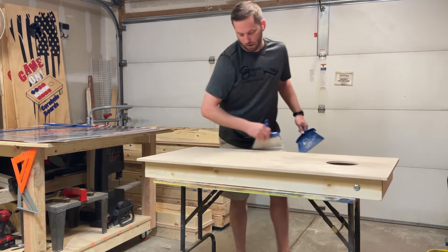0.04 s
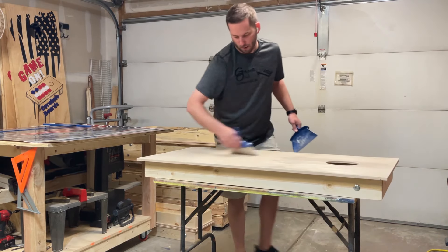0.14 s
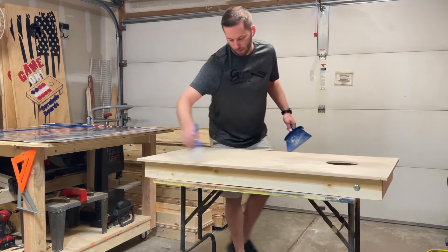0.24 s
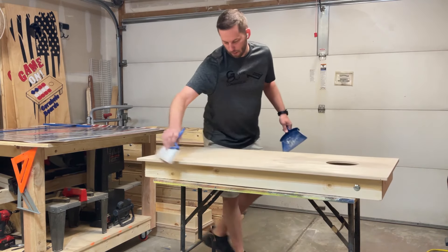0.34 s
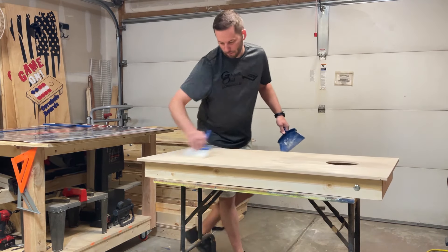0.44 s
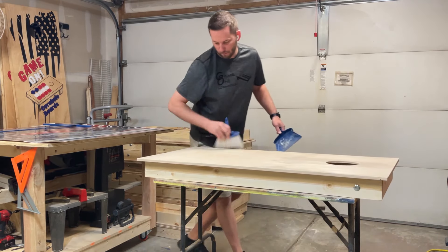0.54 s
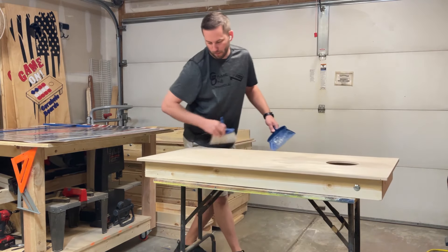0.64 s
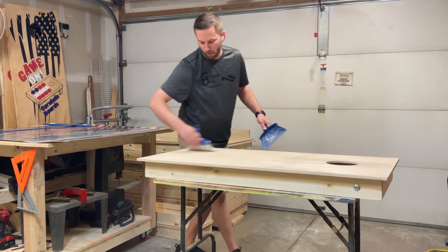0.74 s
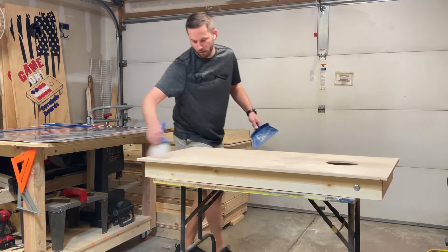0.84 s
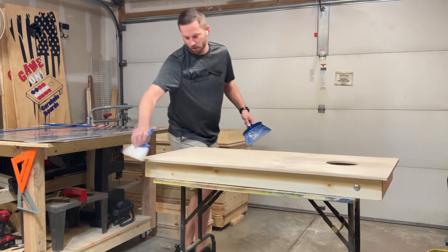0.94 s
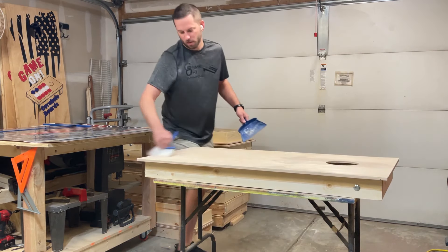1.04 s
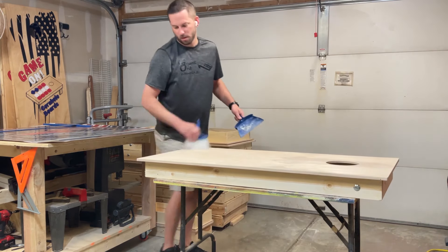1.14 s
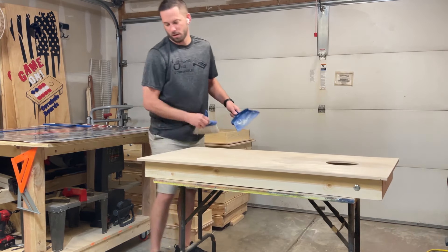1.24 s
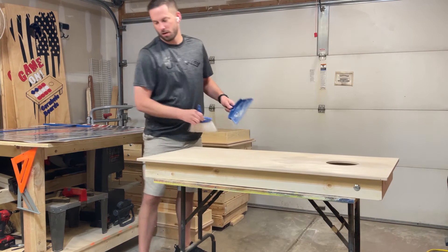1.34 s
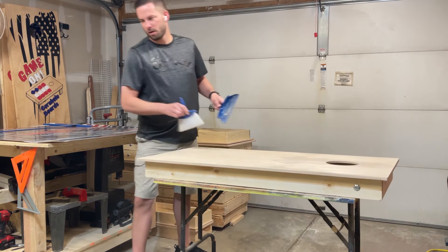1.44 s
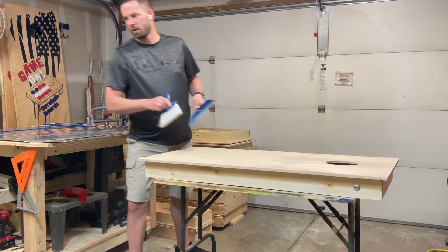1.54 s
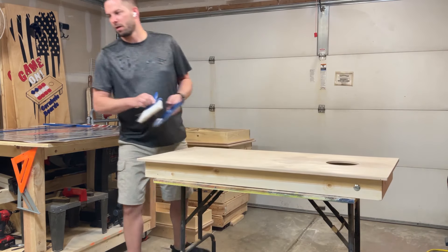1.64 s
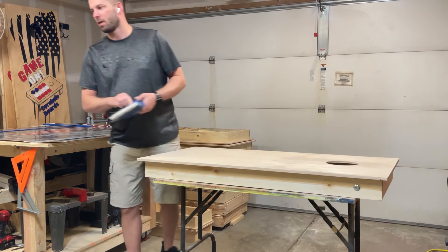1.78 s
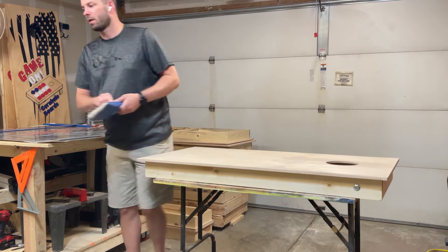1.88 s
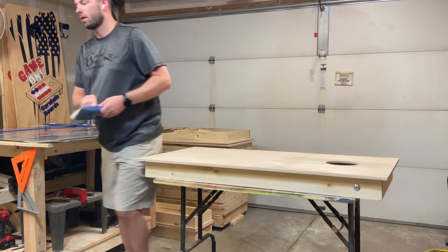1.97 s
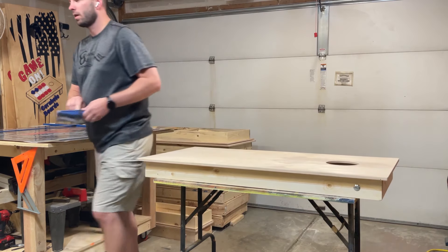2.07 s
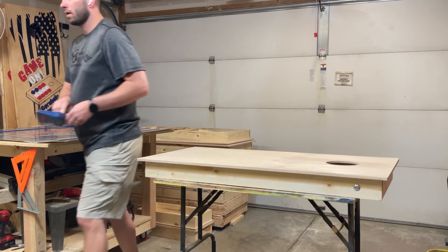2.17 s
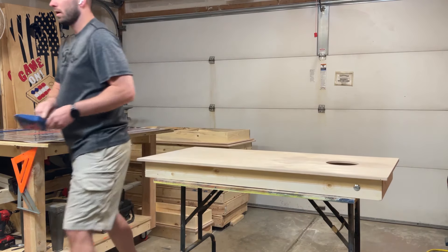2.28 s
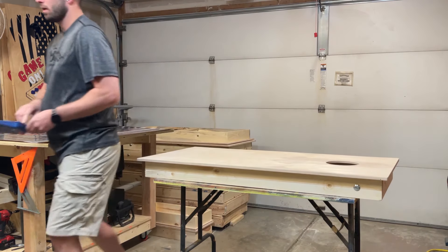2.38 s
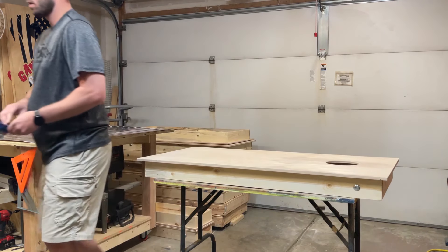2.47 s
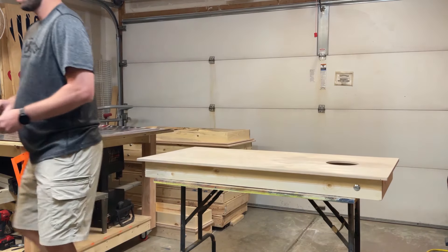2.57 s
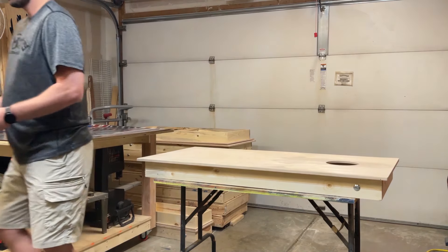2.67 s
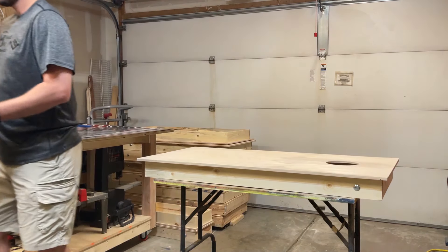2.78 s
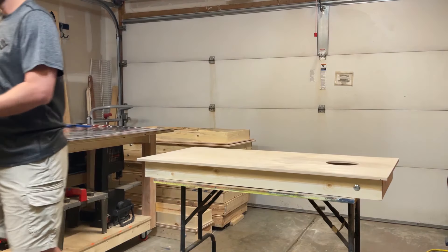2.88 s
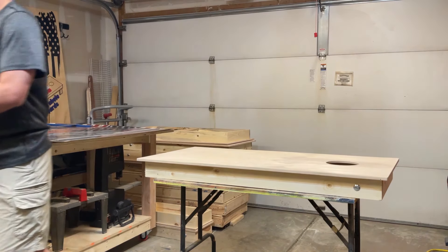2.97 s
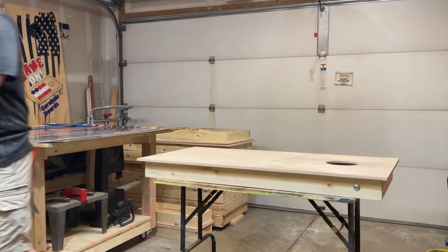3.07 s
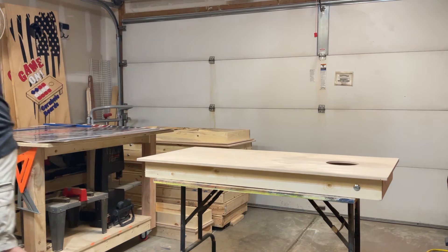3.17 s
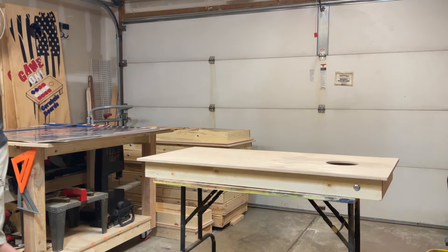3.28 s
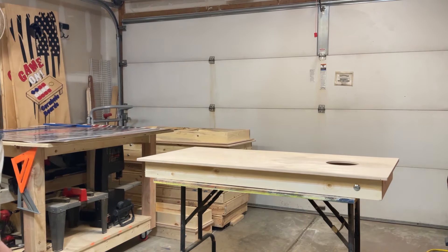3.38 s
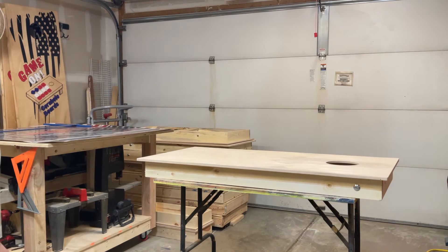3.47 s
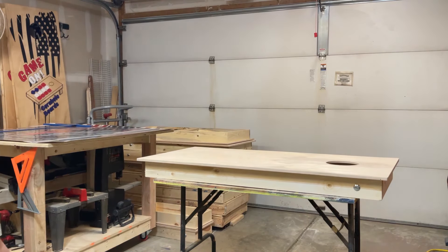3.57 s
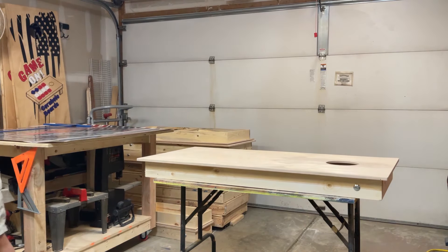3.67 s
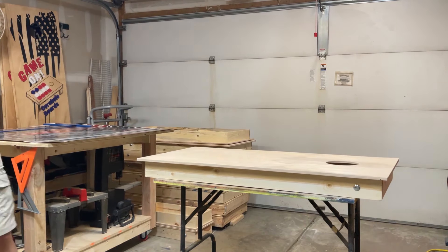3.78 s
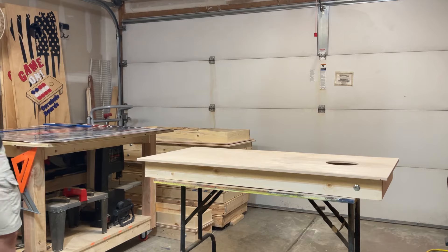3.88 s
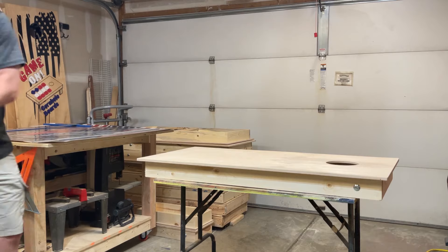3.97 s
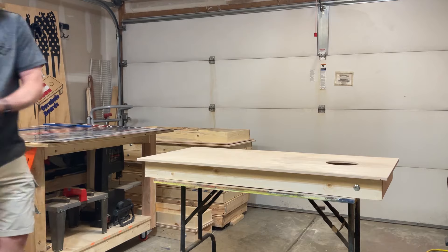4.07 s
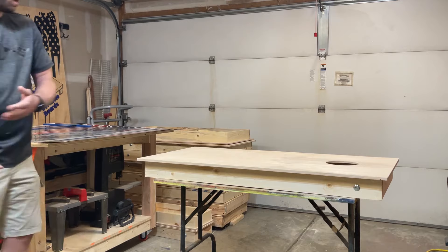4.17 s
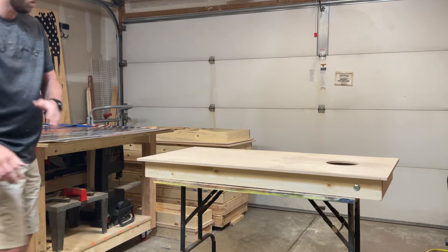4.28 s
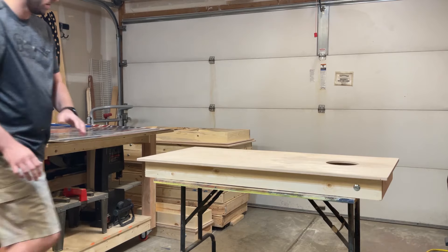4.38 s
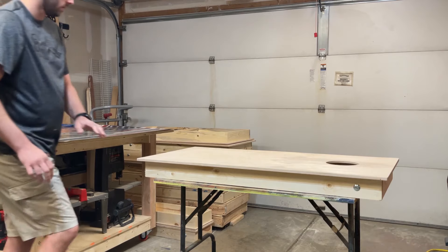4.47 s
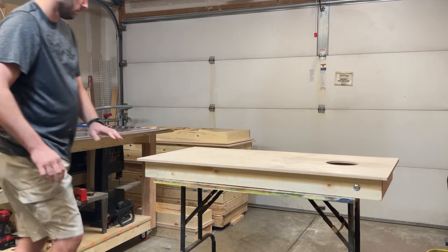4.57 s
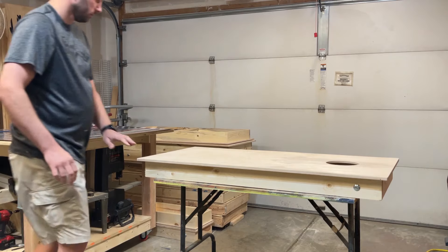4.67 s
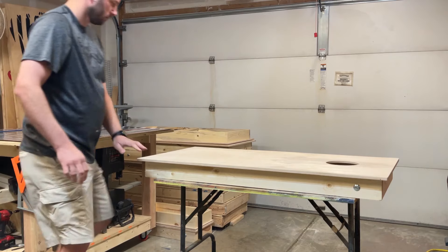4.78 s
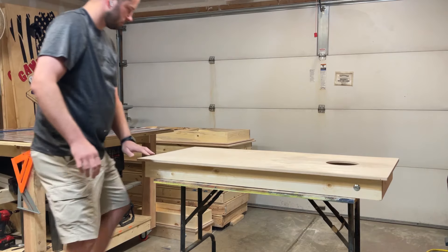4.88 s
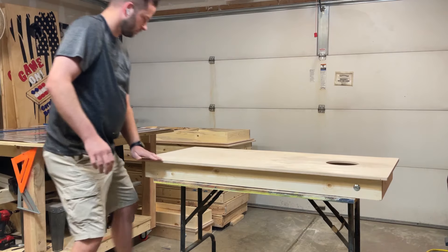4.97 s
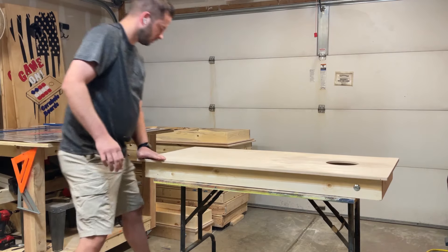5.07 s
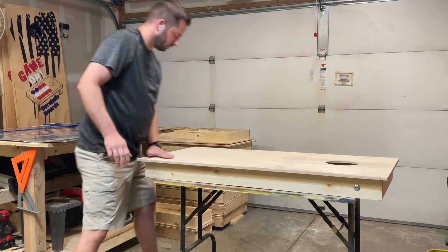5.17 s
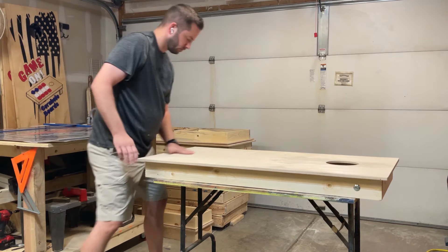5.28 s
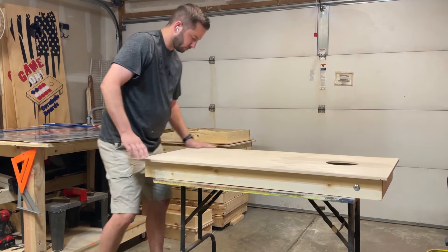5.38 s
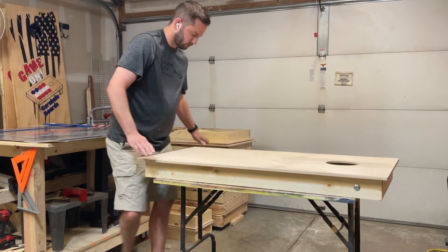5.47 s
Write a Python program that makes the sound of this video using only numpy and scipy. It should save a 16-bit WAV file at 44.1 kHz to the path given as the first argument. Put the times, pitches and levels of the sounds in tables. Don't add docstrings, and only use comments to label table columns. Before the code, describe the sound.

Quick sweeping hisses and low woody thuds come first, with thin plastic clacks from the broom. Quieter shoe scuffs and light plastic ticks follow, then a sharp clatter as broom and dustpan land on a wooden bench and settle. A few soft scuffs lead to a long, smooth hand rub on wood. The garage sounds reverberant, heard from a few steps away, with faint hum and air noise.

```python
import sys
import numpy as np
from scipy import signal
from scipy.io import wavfile
from scipy.ndimage import uniform_filter1d

SR = 44100
rng = np.random.default_rng(int(sys.argv[2]) if len(sys.argv) > 2 else 0)


def volts_from_db(level):
    exponent = np.asarray(level, float) / 20
    return 10 ** exponent


def materialize(psi):
    bounded = np.clip(np.atleast_2d(psi).T, -1, 1)
    quanta = np.round(bounded * 32767).astype(np.int16)
    wavfile.write(sys.argv[1], SR, quanta)


N = 243746


def evened(x):
    return x / np.sqrt(np.mean(x ** 2) + 1e-20)


def read(points, hz):
    f, value = np.transpose(points)
    return np.interp(np.log(hz + 1), np.log(f + 1), value)


def column(points, t):
    return np.interp(t, *np.transpose(points))


def ring(x, modes):
    out = np.zeros(len(x))
    for k, (hz, width, db) in enumerate(modes):
        r = np.exp(-np.pi * width / SR)
        w = 2 * np.pi * min(hz, 15000) / SR
        mode = signal.lfilter([1 - r, 0, r - 1], [1, -2 * r * np.cos(w), r * r], x)
        out += (-1) ** k * volts_from_db(db) * mode
    return out


def slips(per_s, spread_db):
    size = volts_from_db(spread_db * np.minimum(rng.exponential(1, N), 5))
    sign = rng.choice([-1., 1.], N)
    return evened(size * sign * (rng.random(N) < per_s / SR))


def coloured(x, spectrum, bright_db=None, patchy_db=0., size=256):
    overlap = size * 3 // 4
    hz, t, z = signal.stft(x, SR, nperseg=size, noverlap=overlap)
    patches = uniform_filter1d(rng.standard_normal(z.T.shape), 25, 0)
    patches = evened(uniform_filter1d(patches, 4, 1)).T
    gain = volts_from_db(read(spectrum, hz)[:, None] + patchy_db * patches)
    if bright_db is not None:
        octaves = np.log2(np.maximum(hz, 500)[:, None] / 4500)
        gain *= volts_from_db(octaves * bright_db(t) / 1.43)
        middle = (hz > 1500) & (hz < 9000)
        gain /= np.sqrt((gain[middle] ** 2).sum(0) * 2 / size)
    return signal.istft(z * gain, SR, nperseg=size, noverlap=overlap)[1][:N]


def contact(row, t, touch_s, bend, fade):
    s, length, db, landing_db = row[:4]
    swell = landing_db * np.clip(1 - (t - s) / length, 0, 1) ** bend
    lift = np.maximum(t - s - length, 0) * fade
    touch = np.clip(1 + (t - s) / touch_s, 0, 1) ** 2
    return volts_from_db(db + swell - lift) * touch, swell, lift


def drag(hisses, drums, touch, spectrum, body, usual_db, per_s, spread_db, patchy_db, bumps_per_s):
    t = np.arange(0, N / SR, 1 / 2000)
    fine = np.arange(N) / SR
    touch_s, bend, hiss_fade, drum_fade, dull_before, dull_after, landing_dull_db = touch
    contacts = [contact(row, t, touch_s, bend, hiss_fade) for row in hisses]
    level, swell, lift = np.transpose(contacts, (1, 0, 2))

    bright = np.array(hisses)[:, 4:] + dull_before * swell - dull_after * np.minimum(lift, 25)
    since_touch = abs(t - np.array(hisses)[:, :1])
    bright -= landing_dull_db * np.exp(-since_touch / 0.027)
    bright = np.average(bright, axis=0, weights=level ** 2 + 1e-30)

    def bright_db(s):
        return np.interp(s, t, bright) - usual_db

    hiss = coloured(slips(per_s, spread_db), spectrum, bright_db, patchy_db)
    drum = evened(ring(slips(bumps_per_s, 2.14), body))
    drum /= np.sqrt(uniform_filter1d(drum ** 2, 2600) + .05)
    load = sum(contact(row, t, touch_s, bend, drum_fade)[0] for row in drums)
    return np.interp(fine, t, level.sum(0)) * hiss + np.interp(fine, t, load) * drum


# factor on the clack f, width as a share of it, level/dB
SHELL = [(.47, .2, 1), (.68, .2, 3), (1.0, .16, 7), (1.3, .2, 3), (1.9, .3, -1), (2.8, .4, -5)]


def knocks(events, body, tick, rise_s):
    out = np.zeros(N + SR)
    t = np.arange(SR // 4) / SR
    chance = rng.standard_normal((len(events), len(t)))
    for (s, clack_db, hz, thud_db, t60), noise in zip(events, chance):
        rattle = noise * volts_from_db(-60 * t / max(t60, .01)) * (1 + tick * np.exp(-t / 0.00062))
        shell = [(k * hz, w * hz, db) for k, w, db in SHELL if k * hz < SR / 3]
        dull = signal.butter(2, min(2.55 * hz, 15000), fs=SR, output="sos")
        clack = signal.sosfilt(dull, ring(rattle, shell))
        thud = ring(rattle * np.minimum(t / rise_s, 1), body)
        at = slice(round(s * SR), round(s * SR) + len(t))
        out[at] += volts_from_db(clack_db - 1.5) * clack / abs(clack).max() + volts_from_db(thud_db) * thud / abs(thud).max()
    return out[:N]


# f/Hz, level/dB per Hz
AIR = [(15, -21), (25, -21), (129, -1.5), (300, -22), (582, -12), (803, -32), (1240, -15.5), (1620, -25),
       (4490, -19), (4870, -20), (13200, -37.5), (15500, -76)]
# t/s, level/dB
STIR = [(0, 17.5), (1.7, 1.5), (1.83, -0.5), (2.6, -0.5), (2.82, 4), (2.89, -2), (2.94, 1.5), (3.0, -5),
        (3.09, -1), (3.2, -2), (3.95, 2), (4.02, 2), (4.3, 4), (4.6, -0.5), (5.1, 2), (5.53, -5)]
# t/s, level/dB
HUM = [(0.0, -46), (.28, -62), (.6, -45.5), (1.05, -60), (1.3, -46.5), (1.48, -65), (1.62, -50.5),
       (1.8, -63), (2.1, -49), (3.17, -47.5), (3.4, -59), (3.65, -47.5), (3.95, -59.5), (4.28, -71),
       (4.6, -62), (4.85, -45), (5.05, -51.5), (5.53, -43)]
# f/Hz, width/Hz, level/dB
DRONE = (163, 47, 0)


def background():
    t = np.arange(N) / SR
    air = evened(coloured(rng.standard_normal(N), AIR, patchy_db=2.5, size=2048))
    hz, s, z = signal.stft(air, SR, nperseg=512)
    octaves = np.log2(np.maximum(hz, 500) / 1000)
    stir_db = column(STIR, s) * (0.5 + 0.22 * octaves)[:, None]
    air = signal.istft(z * volts_from_db(stir_db), SR, nperseg=512)[1][:N]

    hum_hz, wander_hz = 95.5, 4.34
    beat_per_s, beat_top_s, beat_depth = 5, 2.97, 0.3
    wander = uniform_filter1d(rng.standard_normal(N), 3000)
    wander = evened(uniform_filter1d(wander, 3000))
    hum = np.sqrt(2) * np.sin(2 * np.pi * np.cumsum(hum_hz + wander_hz * wander) / SR)
    beat = 1 + beat_depth * np.cos(2 * np.pi * beat_per_s * (t - beat_top_s))

    drone = evened(ring(rng.standard_normal(N), [DRONE]))
    return volts_from_db(-55) * air + volts_from_db(-69.5) * drone + volts_from_db(column(HUM, t)) * beat * hum


# t/s, length/s, bristle hiss level/dB, landing/dB against it, brightness/dB
STROKES = [(0.0, 0.012, -24.5, 4.5, -12), (0.02, 0.055, -25.5, -4, -5), (.223, 0.04, -34.5, -5, 9),
           (.5, 0.018, -44, -8, -12), (.826, 0.021, -38, -12, -9), (1.102, 0.0075, -41.5, 3, -4),
           (1.25, 0.029, -26, -2, -4.5), (1.33, 0.038, -50.5, -12, -6), (.228, 0.16, -22, -14.5, -8.5),
           (.5, 0.15, -22, -13.5, -6.5), (.79, 0.024, -37, -4, -16.5), (.826, .15, -22.5, -10.5, -7),
           (1.102, 0.14, -20, -22.5, -12.5), (1.47, 0.11, -52, -6, -16)]
# t/s, length/s, level/dB, landing/dB against it
BOARD_DRUM = [(0.0, 0.18, -27, 7.5), (0.242, 0.011, -34.5, 4), (0.353, 0.14, -26, 7.5),
              (0.501, 0.071, -24.5, -1.5), (0.679, 0.022, -34.5, 0), (0.814, 0.16, -35, -12),
              (1.152, 0.13, -27, 2), (1.473, 0.068, -43.5, 0)]
BRISTLES_LAND_S = .009
# touch/s, bend of the swell, hiss fade/dB per s, drum fade/dB per s,
# brightness lost per dB before the top, per dB after it, brightness lost on landing/dB
BROOM_TOUCH = (BRISTLES_LAND_S, 1.79, 275, 146, 0.22, 0.4, 2)
# f/Hz, level/dB per Hz
BRISTLES = [(410, -22), (700, -10), (950, -24), (1100, -12), (1320, -10), (1600, -11), (2370, -3),
            (2560, -3.5), (5080, 1.5), (12600, -8.5), (15500, -18)]
# f/Hz, width/Hz, level/dB
BOARD = [(159.2, 5.8, -7), (213, 6.2, 1), (264, 44, -7), (393, 58, -7.5), (471, 13.7, -1.5),
         (528, 58, -5.5), (617, 110, -8), (720, 194, -13.5), (900, 106, -16.5), (1050, 100, -20.5)]


def broom_strokes():
    return drag(STROKES, BOARD_DRUM, BROOM_TOUCH, BRISTLES, BOARD, usual_db=-8.5,
                per_s=15000, spread_db=1.5, patchy_db=0.5, bumps_per_s=500)


# t/s, peak level/dB, f/Hz,
# length/s
THUMPS = [(0.0, -18.5, 421, 0.07), (.06, -13, 213, 0.1), (.23, -24, 496, 0.027), (.345, -15, 556, 0.045),
          (.365, -11, 213, 0.047), (.385, -13, 518, 0.025), (.46, -20.5, 213, 0.057),
          (.535, -16.5, 528, 0.05), (.58, -16.5, 510, 0.03), (.59, -23, 213, 0.047), (.89, -24, 213, .1),
          (1.16, -16.5, 539, 0.022), (1.175, -22, 213, 0.11), (0.168, -15, 243, 0.027),
          (1.9, -36, 413, 0.055), (2.08, -24, 330, 0.024), (3.15, -32, 516, 0.02), (3.572, -14, 430, 0.037),
          (3.575, -16, 309, 0.046), (3.601, -13, 285, 0.044), (3.645, -19.5, 450, 0.022),
          (3.717, -18.5, 399, 0.037), (3.734, -10.5, 326, 0.042), (3.788, -24, 360, 0.03),
          (3.82, -32, 323, 0.025), (3.844, -40, 350, 0.029), (3.89, -42, 504, 0.033),
          (4.64, -48, 217, 0.023), (5.16, -26.5, 213, 0.075), (5.295, -26.5, 491, 0.064),
          (1.632, -29, 650, 0.005), (1.64, -29, 700, 0.0083), (3.41, -36, 216, 0.03),
          (1.0, -40, 154, 0.088), (.055, -27, 720, .018), (.338, -17, 886, 0.023), (.34, -13.5, 637, 0.024),
          (.375, -26, 1250, 0.055), (.445, -28, 763, 0.036), (.535, -29, 890, .025), (1.148, -23, 820, .02),
          (1.245, -26, 670, .02), (1.662, -31, 595, 0.012), (2.058, -30, 310, 0.019),
          (2.443, -30, 720, 0.023), (2.48, -25, 953, 0.023), (2.47, -33, 374, .02),
          (3.128, -33, 492, 0.021), (5.15, -35, 560, 0.026), (3.44, -38, 200, .06),
          (.005, -17.5, 541, 0.032), (.095, -20, 522, 0.044), (.165, -21, 507, .035),
           (.255, -27, 490, .03), (.293, -31, 480, .025), (.39, -18, 469, .025), (.35, -15, 262, .025),
           (.67, -26.5, 500, 0.026), (.708, -30, 550, .025), (.865, -28, 557, .03), (.895, -24, 225, .025),
           (1.17, -18, 480, .02), (1.195, -18, 530, 0.033), (1.23, -19, 520, .03), (1.268, -19, 478, 0.026),
           (1.305, -23, 502, 0.034), (1.22, -17, 213, .05), (1.15, -20, 322, 0.032),
           (1.452, -34.5, 483, .03), (1.515, -33, 300, .02), (5.24, -29, 150, .04), (5.36, -35, 478, 0.047),
           (1.26, -28, 157, .09), (1.36, -32, 160, .08), (1.27, -25, 370, .04), (.02, -22, 390, .04),
           (.11, -25, 395, .04), (1.56, -36, 157, .06), (.59, -24, 600, .03), (5.17, -35, 155, .05)]


def thumps():
    out = np.zeros(N)
    for s, db, hz, length in THUMPS:
        t = np.arange(round(length * SR)) / SR
        swell = np.sin(np.pi * t / length) ** 2
        out[round(s * SR):][:len(t)] += volts_from_db(db) * swell * np.sin(2 * np.pi * hz * t)
    return out


# t/s, clack level/dB, clack f/Hz, thud level/dB, rattle t60/s
BOARD_KNOCKS = [(.068, -20.5, 900, -15, 0.083), (.337, -35, 900, -11.5, 0.045),
                (.343, -9, 2180, -11.5, 0.48), (.535, -28, 900, -19, 0.14), (.575, -15, 3600, -22.5, 0.23),
                (.872, -27, 900, -22, 0.06), (.986, -22, 2030, -55, 0.29), (1.012, -16, 2400, -36, 0.18),
                (1.106, -37, 4000, -34, 0.18), (1.145, -41, 900, -18.5, 0.069),
                (1.162, -33, 900, -11.5, 0.039), (5.15, -27, 1200, -37, 0.8)]


def board_knocks():
    return knocks(BOARD_KNOCKS, BOARD, tick=1.2, rise_s=.008)


# t/s, peak level/dB, f/Hz, width/Hz, t60/s
EDGES = [(.987, -23, 2480, 500, 0.096), (.993, -21, 1900, 600, 0.09), (1.563, -40, 2150, 460, 0.12),
         (1.3, -30, 1850, 600, 0.099), (0.987, -26, 1260, 260, 0.24), (1.561, -26.5, 7460, 1600, 0.054),
         (1.3, -38, 2000, 230, 0.14), (3.135, -29, 2940, 430, 0.13), (.343, -18, 3100, 1000, .12),
         (3.128, -30, 1920, 390, .06), (3.574, -19.5, 2790, 240, 0.17), (2.447, -23.5, 1410, 230, 0.18),
         (2.449, -18, 3400, 2000, 0.028), (2.275, -25.5, 760, 380, 0.077), (3.68, -27, 1310, 250, 0.3)]


def edges():
    out = np.zeros(N + SR)
    t = np.arange(SR // 4) / SR
    chance = rng.standard_normal((len(EDGES), len(t)))
    for (s, db, hz, width, t60), noise in zip(EDGES, chance):
        rasp = noise * volts_from_db(-60 * t / max(t60, .01))
        band = ring(ring(rasp, [(hz, width, 0)]), [(hz, width, 0)])
        out[round(s * SR):][:len(t)] += volts_from_db(db) * band / abs(band).max()
    return out[:N]


# t/s, clack level/dB, clack f/Hz, thud level/dB, rattle t60/s
PAN_KNOCKS = [(1.489, -54, 900, -33, 0.052), (1.562, -29, 7700, -49, 0.084), (1.563, -36, 2060, -47, 0.17),
              (1.632, -30, 900, -48, 0.062), (1.657, -37, 795, -44, 0.12), (1.749, -38, 5970, -58, 0.07),
              (2.059, -20, 1050, -33.5, 0.42), (2.274, -20, 1000, -51, 0.22),
              (2.447, -14.5, 1435, -53, 0.071), (2.448, -21, 3020, -45, 0.011),
              (2.449, -23, 3400, -32, 0.18), (2.489, -28, 1400, -59, 0.054),
              (3.117, -35, 2870, -33.5, 0.38), (3.148, -28.5, 3020, -59, 0.1), (3.412, -62, 603, -47, 0.12),
              (3.438, -56, 601, -37, 0.082), (3.455, -39, 12700, -61, 0.68), (4.036, -39, 2190, -51, 0.2),
              (4.078, -33, 900, -32.5, 0.084), (4.676, -38, 1140, -39, 0.27), (4.79, -50, 900, -41, 0.067)]
# f/Hz, width/Hz, level/dB
GROUND = [(152, 22, -1), (235, 68, -4.5), (341, 43, 1), (413, 89, 2.5), (498, 167, 1), (657, 316, -5.5),
          (1090, 83, -14)]


def pan_knocks():
    return knocks(PAN_KNOCKS, GROUND, tick=1.5, rise_s=.004)


# t/s, length/s, f/Hz, boost/dB
HOLLOW = [(1.98, 0.16, 1210, 12), (1.95, 0.22, 1700, 11.5), (2.41, 0.24, 3350, 9), (3.08, 0.73, 3060, 7.5),
          (3.426, 0.12, 5070, 5), (4.692, 0.21, 4300, 7)]


def hollow(x):
    hz, t, z = signal.stft(x, SR, nperseg=256, noverlap=192)
    lift_db = 0
    for s, length, f, db in HOLLOW:
        swell = np.sin(np.pi * np.clip((t - s) / length, 0, 1))
        band = np.exp(-(np.log((hz[:, None] + 1) / f) / .15) ** 2)
        lift_db = lift_db + db * swell * band
    return signal.istft(z * volts_from_db(lift_db), SR, nperseg=256, noverlap=192)[1][:N]


# t/s, length/s, hiss level/dB, landing/dB against it, brightness/dB
SCUFFS = [(1.562, 0.03, -45, -10, -20), (1.633, 0.022, -48.5, -12, -25), (1.849, 0.023, -50.5, -1, -10),
          (1.854, 0.21, -36.5, -11.5, -21), (2.21, 0.097, -38, -24, -23), (2.276, 0.051, -36.5, -11, -18),
          (2.31, 0.18, -30, -11.5, -22.5), (2.7, 0.18, -61, -3, -26), (2.96, 0.012, -62, -10, -24),
          (3.113, 0.25, -48, 6, -24), (3.41, 0.15, -39.5, -33, -24.5), (4.028, 0.012, -42, -16, -21.5),
          (4.042, 0.15, -44.5, -7, -16), (4.14, 0.051, -40.5, -15, -14), (4.3, 0.54, -55.5, -14, -23.5),
          (4.673, 0.2, -39, -5.5, -24), (4.95, 0.051, -57, 7, -10), (5.03, 0.19, -44.5, -31, -21)]
# t/s, length/s, level/dB, landing/dB against it
SCRAPES = [(1.566, 0.0089, -46.5, 19), (1.638, 0.013, -40, 12.5), (1.856, 0.3, -48, -5),
           (2.28, 0.26, -43, 5.5), (2.724, 0.053, -57.5, -5), (3.104, 0.17, -53.5, -7),
           (3.38, 0.017, -57, -8), (3.412, 0.068, -49, 8), (4.038, 0.05, -44.5, -7),
           (4.16, 0.016, -56.5, -4), (4.375, 0.59, -59, -1), (4.68, 0.17, -42, 3.5), (4.977, 0.16, -64, 14)]
SOLE_LANDS_S = .004
# [s, -, dB/s, dB/s, dB/dB, dB/dB, dB]
SHOE_TOUCH = (SOLE_LANDS_S, 3.3, 176, 152, -0.32, 0.44, 5.7)
# f/Hz, level/dB per Hz
SOLE = [(350, -40), (600, -9), (660, -18.5), (855, -14), (1270, -6.5), (1860, -5), (2180, -0.5), (3110, -1),
        (4550, 4.5), (6500, 3), (11800, -3.5), (15500, -12.5)]


def shoe_scuffs():
    scuffs = drag(SCUFFS, SCRAPES, SHOE_TOUCH, SOLE, GROUND, usual_db=-14.5,
                  per_s=16000, spread_db=2.5, patchy_db=2.5, bumps_per_s=400)
    return hollow(scuffs)


# t/s, clack level/dB, clack f/Hz, thud level/dB, rattle t60/s
BOUNCES = [
    (3.572, -9, 2580, -27, 0.16),
    (3.612, -21, 2970, -16.5, 0.062),
    (3.678, -11.5, 1280, -22, 0.056),
    (3.738, -19.5, 1300, -24, 0.12),
    (3.797, -40, 1350, -34, 0.059),
    (3.876, -28.5, 1930, -49, 0.25),
    (3.915, -44, 11500, -62, 0.3),
]
# f/Hz, width/Hz, level/dB
BENCH = [(195, 8.5, -3.5), (222, 42, -11), (281, 40, 1.5), (312, 34, 0), (350, 53, 2), (430, 55, 1),
         (500, 79, -9.5), (708, 41, -6.5), (1000, 83, -12)]


def bench_bounces():
    return knocks(BOUNCES, BENCH, tick=2.5, rise_s=.008)


# t/s, length/s, hiss level/dB, landing/dB against it, brightness/dB
SETTLE = [
    (3.574, 0.047, -22.5, 2.5, -30),
    (3.645, 0.1, -34.5, -0.5, -28),
    (3.872, 0.04, -47, -2, -35.5),
]
# t/s, length/s, level/dB, landing/dB against it
BENCH_DRUM = [
    (3.582, 0.12, -32, 11.5),
    (3.727, 0.019, -28.5, -8),
    (3.87, 0.043, -49, -9),
]
# [s, -, dB/s, dB/s, dB/dB, dB/dB, dB]
PAN_TOUCH = (0.0074, 0.98, 390, 490, 0.19, 0.13, 0.53)
# f/Hz, level/dB per Hz
CLATTER = [(350, -24), (600, -8), (706, -8.5), (855, -22), (953, -4.5), (1300, -4.5), (1990, -3.5),
           (2910, -1.5), (5810, -4.5), (12000, -23.5), (15500, -32)]


def bench_settling():
    return drag(SETTLE, BENCH_DRUM, PAN_TOUCH, CLATTER, BENCH, usual_db=-25.5,
                per_s=9000, spread_db=3.0, patchy_db=0.0, bumps_per_s=510)


# t/s, length/s, hiss level/dB, landing/dB against it, brightness/dB
PALM = [
    (5.165, 0.039, -41.5, -6, 8),
    (5.148, 0.35, -17.5, -25.5, -13),
]
# t/s, length/s, level/dB, landing/dB against it
PALM_DRUM = [
    (5.165, 0.16, -41, 8.5),
    (5.289, 0.023, -41, -11),
    (5.344, 0.24, -43, -3),
]
# [s, -, dB/s, dB/s, dB/dB, dB/dB, dB]
PALM_TOUCH = (0.032, 1.73, 83, 210, 0.54, .1, 0.83)
# f/Hz, level/dB per Hz
SKIN = [(410, -23), (700, -27.5), (1090, -26.5), (1320, -17), (1430, -18.5), (2080, -11.5), (2280, -8.5),
        (5490, 1), (12900, -11), (15500, -20)]


def palm_rub():
    return drag(PALM, PALM_DRUM, PALM_TOUCH, SKIN, BOARD, usual_db=-9.5,
                per_s=17000, spread_db=3.0, patchy_db=-0.3, bumps_per_s=450)


# f/Hz, t60/s
GARAGE = [(120, 0.96), (330, 0.38), (870, 0.43), (2300, 0.5), (6000, 0.4), (14000, 0.2)]
# t/s, level/dB
WALLS = [(.0041, -20), (.0093, -45), (0.014, -19), (0.018, -45), (0.028, -21)]


def garage(x, count=3):
    tail_db, build_s, shift_s = -7, 0.026, .23
    hz, t, z = signal.stft(rng.standard_normal((count, SR)), SR, nperseg=256)
    decay = volts_from_db(-60 * t / read(GARAGE, hz)[:, None])
    tails = signal.istft(z * decay, SR, nperseg=256)[1][:, :SR]
    tails *= np.minimum(np.arange(SR) / SR / build_s, 1)
    tails *= volts_from_db(tail_db) / np.linalg.norm(tails[0])
    turn = 2 * np.pi * (np.arange(N) / SR / shift_s + np.arange(count)[:, None] / count)
    sends = x * np.cos(turn) * np.sqrt(2 / count)
    wet = signal.fftconvolve(sends, tails, axes=1)[:, :N].sum(0)
    echoes = sum(volts_from_db(db) * np.pad(x, (round(s * SR), 0))[:N] for s, db in WALLS)
    return (x + echoes + wet) / np.sqrt(1 + volts_from_db(2 * tail_db))


def scene():
    soft_blows = thumps()
    dragging = broom_strokes() + shoe_scuffs() + bench_settling() + palm_rub()
    hits = board_knocks() + pan_knocks() + bench_bounces()
    room = garage(dragging + hits + edges() + 0.32 * soft_blows)
    mono = room + 0.36 * soft_blows + background()
    return np.tile(mono, (2, 1))


def top_cut(x):
    return signal.sosfilt(signal.butter(12, 15630, fs=SR, output="sos"), x)


def record(dry):
    ceiling = .62
    x = dry / (1 + abs(dry / ceiling) ** 4) ** (1 / 4)
    x = signal.sosfilt(signal.butter(3, 75, "highpass", fs=SR, output="sos"), x)
    return top_cut(x)


dry = scene()
out = record(dry)
materialize(out)
```